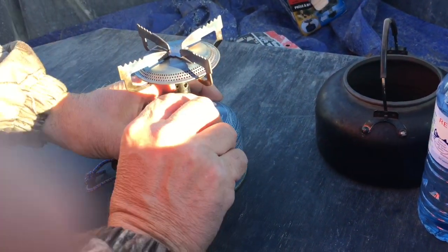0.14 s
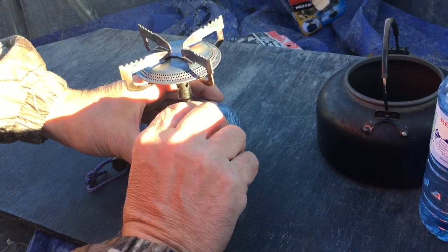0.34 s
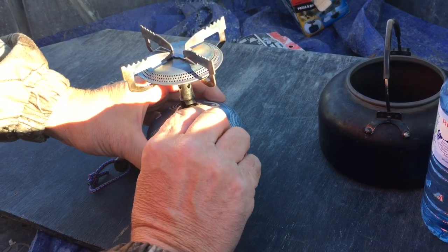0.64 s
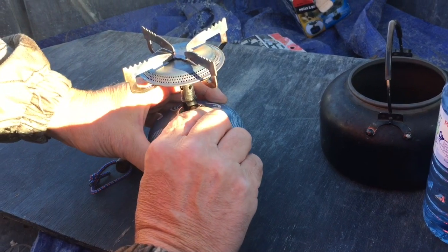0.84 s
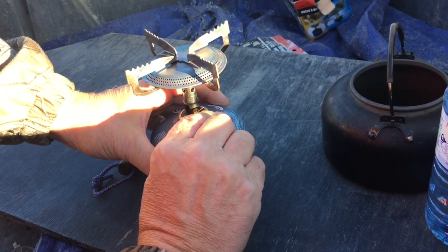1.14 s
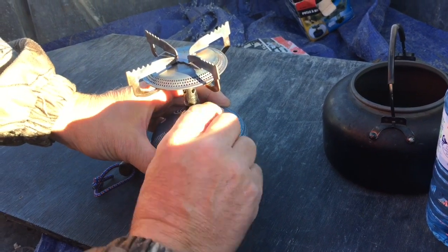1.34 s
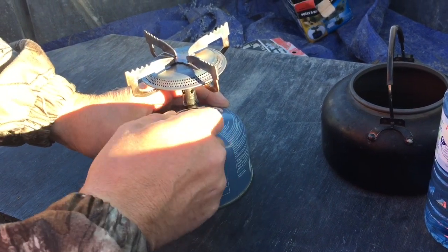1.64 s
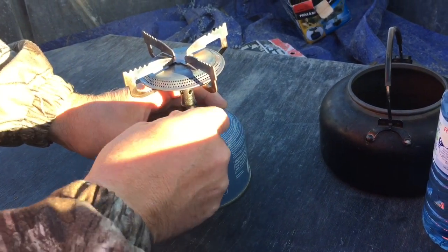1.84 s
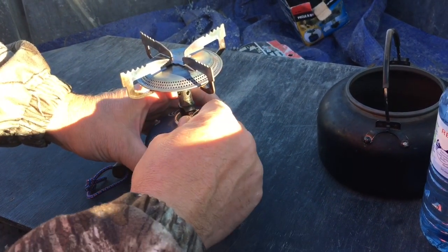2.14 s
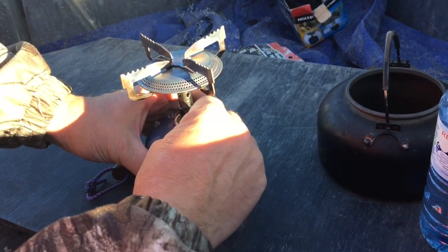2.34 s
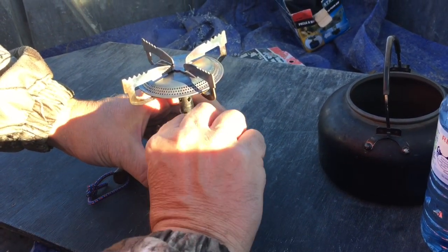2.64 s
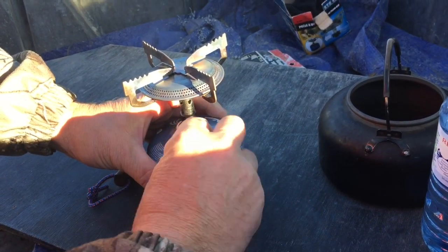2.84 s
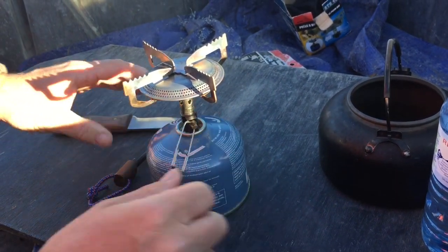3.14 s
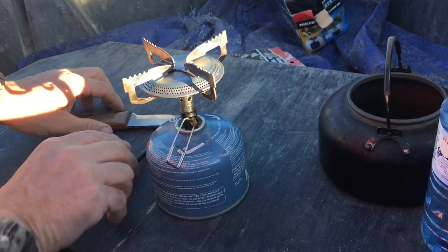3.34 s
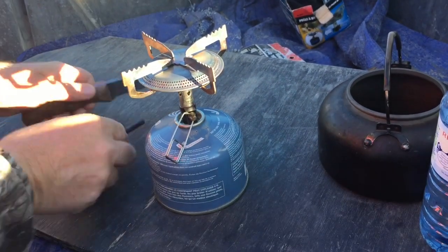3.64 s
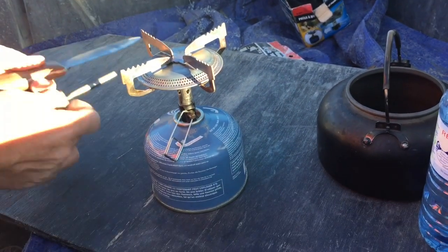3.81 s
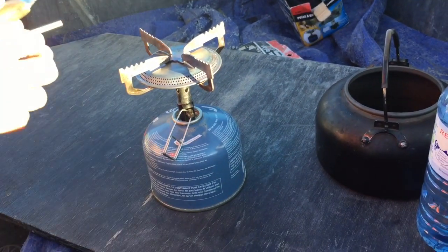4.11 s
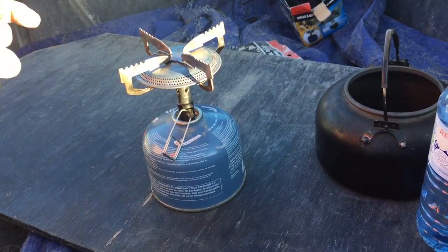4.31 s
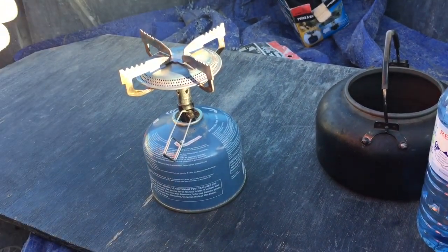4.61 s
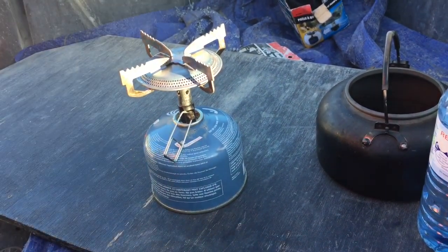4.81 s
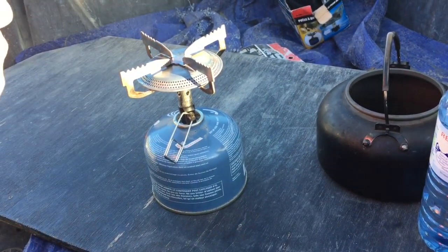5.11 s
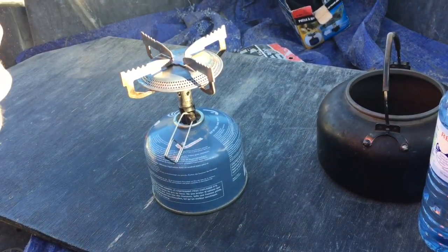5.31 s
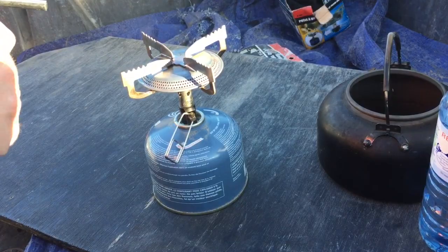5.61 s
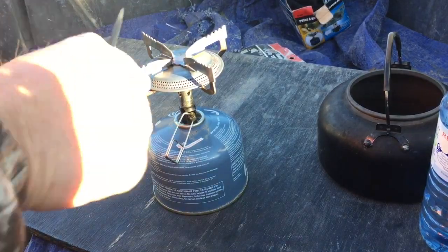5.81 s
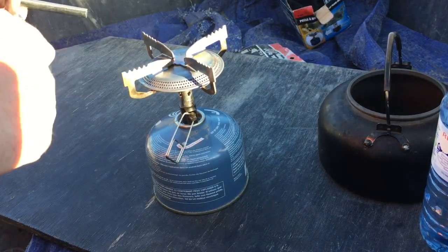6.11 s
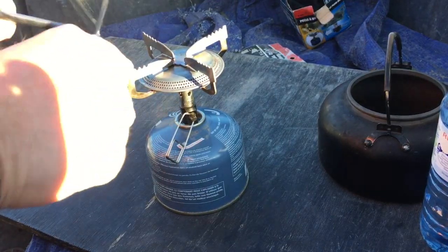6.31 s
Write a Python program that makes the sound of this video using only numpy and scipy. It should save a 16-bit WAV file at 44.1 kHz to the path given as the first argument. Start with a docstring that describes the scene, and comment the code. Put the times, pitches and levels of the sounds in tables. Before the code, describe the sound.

Handling thumps on the microphone, metal clinks as a burner is turned, then gas hisses steadily while a blade drags and clacks on steel.

```python
"""Loud bumps and a dulling rumble come first, as a hand settles its grip on the microphone, with a brief scrape.
Outdoors, hands screw and turn a gas burner on its canister: grit drives damped modes as parts clink and fingers rub.
The valve opens and gas hisses: turbulent noise with peaks, perhaps from its echo off the board.
A knife touches a steel rod, is dragged off its board in uneven slips, then is struck and scraped on the rod.
Behind lie a far, wavering hum, made of a slowly sinking tone, and the smooth noise of open air."""
import sys
import numpy as np
from scipy import signal
from scipy.fft import rfft, irfft
from scipy.io import wavfile
from scipy.ndimage import uniform_filter1d

SR = 44100
rng = np.random.default_rng(int(sys.argv[2]) if len(sys.argv) > 2 else 0)


def linear_from_db(decibels):
    """Turn decibels (scalar or array-like) into linear amplitude factors; 0 gives 1."""
    return 10 ** (np.asarray(decibels, float) / 20)


def store_wav(level_fs):
    """Save 16-bit WAV to argv[1]."""
    pcm = np.round(np.clip(np.atleast_2d(level_fs), -1, 1) * 32767)
    wavfile.write(sys.argv[1], SR, pcm.T.astype(np.int16))


N = 284886  # length in samples

# Gas flow once the valve is open. Each row: time in seconds, hiss level in dB.
GAS_FLOW = [(2.6, -39.5), (2.84, -40.5), (3.4, -42), (4.1, -42), (4.67, -42.5), (5.15, -43.5), (5.6, -43),
            (6.46, -44)]
# Broad colour of the turbulent jet. Each row: frequency in Hz, relative density in dB per Hz.
JET_COLOUR = [(110, -30), (200, 0), (1350, 0), (2200, 3), (3300, -3), (4400, 2), (5600, 0), (6300, -4),
              (7000, -2), (8000, -7), (10500, -13), (12300, -12), (14500, -9), (16000, -6)]
# Peaks in the hiss, perhaps from its echo off the board, over the jet's broad colour.
# Each row: frequency in Hz, width in Hz, boost in dB.
HISS_PEAKS = [(620, 220, 4), (1000, 350, 4), (1860, 400, 6), (2490, 220, 9.5), (2800, 250, 3),
              (3950, 500, 3), (4980, 560, 11.5), (5400, 180, 4), (5860, 240, 5), (6700, 400, 5),
              (7420, 560, 8), (8800, 1300, 4), (10000, 180, 4), (11400, 420, 12), (13200, 500, 5),
              (15350, 800, 5)]
# Modes of burner and canister. Each row: frequency in Hz, relative level in dB, 60 dB decay time in seconds.
BURNER_MODES = [(370, -3, .09), (711, 2, .12), (931, -9, .1), (1217, -8, .12), (1631, 3, .18),
                (2622, -19, .4), (2760, -18, .4), (3149, -3, .1), (3445, -18, .25), (3747, -19, .45),
                (3920, -19, .4), (4414, 0, .09), (4834, -9, .08), (5120, -11, .1), (5690, -6, .09),
                (5908, -9, .15), (6600, -5, .15), (6900, 0, .05), (7250, -2, .05), (7892, -14, .13),
                (8780, -11, .05), (9388, -11, .06), (10200, -10, .05), (11500, -11, .04)]
# Clinks of metal parts, and low knocks of the canister on the board. Each row: start in seconds, peak in dB,
# centre in Hz, spread in octaves, # contact time in seconds.
CLINKS = [(.169, -25.5, 5150, 0.67, 0.0059), (1.459, -48, 600, 0.94, 0.0043),
          (1.52, -49, 1650, 0.16, 0.022), (1.588, -48.5, 6440, 0.77, 0.037),
          (1.78, -36.5, 5600, 1.6, 0.058), (1.8085, -22.5, 6450, 0.52, 0.009),
          (1.81, -24, 844, 0.61, 0.0086), (1.866, -32.5, 5530, 1.04, 0.0059),
          (1.9704, -34.5, 6140, 0.37, 0.0038), (2.047, -50, 6040, 0.4, .006),
          (2.2285, -31.5, 4160, .7, 0.018), (2.24, -39, 5600, 0.63, 0.01), (2.274, -36, 4930, 1.6, 0.0093),
          (2.3559, -21.5, 5400, 0.81, 0.0057), (2.37, -27, 4600, 1.1, 0.021),
          (2.4144, -15, 4000, 1.33, 0.008), (2.416, -21.5, 403, 0.37, 0.014)]
# Finger strokes on metal. Each row: start in seconds, length in seconds, level in dB.
FINGER_RUBS = [(0.158, 0.052, -52), (0.209, .13, -56.5), (1.436, .12, -62), (1.72, 0.083, -67),
               (1.792, 0.2, -63), (2.03, 0.12, -64.5), (2.184, 0.14, -59), (2.393, 0.094, -55)]
# Colour of skin sliding on metal. Each row: frequency in Hz, relative density in dB per Hz.
RUB_COLOUR = [(180, -21), (300, 4), (519, -1.5), (1120, -20), (2790, -4), (4090, -12.5), (6200, -6),
              (8220, -17.5), (9800, -16), (12700, -21.5), (16000, -25)]
# Resonances of the board. Each row: frequency in Hz, width in Hz, relative level in dB.
BOARD_RESONANCES = [(137, 49, -1), (264.3, 45, 5), (393, 71, -13), (600, 44, 2), (717, 73, -16),
                    (1190, 170, -11)]
# The dragged knife catches and slips. Each row: start in seconds, board level in dB, grit level in dB.
KNIFE_SLIPS = [(3.449, -27.5, -53), (3.481, -37, -42), (3.556, -52, -35.5), (3.566, -31, -35),
               (3.592, -24, -59), (3.636, -30, -42), (3.674, -30.5, -51), (3.695, -29.5, -50)]
# Modes of blade and rod, damped by the hand. Each row: frequency in Hz, relative level in dB,
# 60 dB decay time in seconds.
STEEL_MODES = [(1130, 0, .025), (1520, 0, .025), (2210, -2, .018), (2715, 2, .018), (3200, -5, .015),
               (4080, 0, .017), (4500, -6, .012), (6000, -4, .015), (7500, -6, .015), (9900, -10, .012),
               (11400, -10, .012)]
# Blade meets rod. Each row: start in seconds, peak in dB, centre in Hz, spread in octaves,
# contact time in seconds.
BLADE_STRIKES = [(3.2246, -28, 2400, 0.65, 0.0078), (3.525, -28, 2400, 0.23, 0.0039),
                 (3.8901, -25.5, 2730, 0.61, 0.0035), (5.5145, -14, 4000, 0.55, 0.006),
                 (5.641, -30, 2500, 0.86, 0.0071), (5.8544, -18, 3240, 0.65, 0.0054),
                 (5.8875, -22.5, 3500, 0.99, 0.0048), (6.1664, -11.5, 2900, 0.57, 0.0039),
                 (6.2028, -21, 2520, 0.23, 0.0042), (6.2293, -30.5, 1640, .7, 0.0039),
                 (6.327, -18, 2750, 0.097, 0.0076)]
# Blade scrapes along the rod. Each row: start in seconds, length in seconds, level in dB, centre in Hz,
# spread in octaves.
BLADE_STROKES = [(3.232, 0.025, -36.5, 2080, 0.19), (5.842, 0.019, -28.5, 3140, .5),
                 (5.86, 0.025, -29, 2740, 0.12), (5.864, 0.02, -30, 1400, 0.14),
                 (6.208, .02, -43, 2530, 0.22), (6.302, 0.017, -33.5, 2900, 0.45),
                 (6.315, 0.02, -26.5, 2740, 0.061), (6.334, 0.02, -32, 2560, 0.66)]
# Bumps on the microphone. Each row: start in seconds, peak in dB, pitch in Hz.
MICROPHONE_BUMPS = [(.058, -6.5, 215.5), (.088, -16.5, 192), (.125, -13, 145.6), (0.194, -21, 119.5),
                    (0.334, -25.5, 82), (1.11, -31, 132), (1.164, -27.5, 119), (1.194, -26.5, 45.6),
                    (2.25, -31, 75), (2.42, -26, 169), (2.691, -24.5, 65), (2.936, -28.5, 71),
                    (3.021, -33.5, 70), (3.195, -26, 113), (3.46, -34, 62), (5.177, -25.5, 62.3),
                    (5.209, -29, 111), (5.469, -27, 88.4), (5.857, -28, 45.4), (5.899, -28.5, 55.6),
                    (6.028, -34, 61.4)]
# The far hum. Each row: time in seconds, level in dB.
HUM_LEVEL = [(0.25, -45), (0.36, -36.5), (.9, -40), (1.2, -38), (1.4, -38), (1.85, -36), (2.3, -43),
             (2.45, -38), (2.7, -40), (2.8, -48.5), (3.4, -45), (3.6, -36), (3.8, -45), (4.2, -43),
             (4.5, -47.5), (5.5, -47), (5.7, -52), (6.46, -50.5)]
# Colour of the open air. Each row: frequency in Hz, relative density in dB per Hz.
AIR_COLOUR = [(15, -76), (25, -18), (43, -11.5), (76, 4.5), (102, -1), (127, -21.5), (161, -21),
              (545, -37.5), (887, -36.5), (1100, -27), (1370, -34.5), (4250, -42), (4870, -43),
              (14400, -54), (16000, -41)]


def clock():
    """Sampling principle: the time in seconds of every sample."""
    return np.arange(N) / SR


def evened(x):
    """Normalisation of power: scales a signal to rms 1."""
    return x / np.sqrt(np.mean(x ** 2) + 1e-20)


def band_rms(x, lo_hz, hi_hz):
    """Band filtering: the rms of a signal between two frequencies."""
    band = signal.butter(4, [lo_hz, hi_hz], "band", fs=SR, output="sos")
    return np.std(signal.sosfilt(band, x))


def level_over_time(rows):
    """Linear interpolation of a level in dB between its rows, at every sample."""
    s, db = np.transpose(rows)
    return np.interp(clock(), s, db)


def colour_db(rows, hz):
    """Linear interpolation of a spectrum in dB on a logarithmic frequency axis."""
    f, db = np.transpose(rows)
    return np.interp(np.log(hz + 1), np.log(f + 1), db)


def resonance_power(peaks, hz):
    """Lorentzian resonance: summed power of peaks given as (Hz, half-power width in Hz, dB)."""
    return sum(linear_from_db(db) ** 2 / (1 + (2 * (hz - f) / w) ** 2) for f, w, db in peaks)


def nearness(hz, centre_hz, octaves):
    """Selective excitation: a Gaussian weight on the distance in octaves from a centre."""
    return np.exp(-.5 * (np.log2(hz / centre_hz) / octaves) ** 2)


def hold(start, length, edge):
    """Envelope principle: swells in over edge seconds, holds until length, then decays exponentially."""
    t = clock() - start
    swell = np.clip(t / edge, 0, 1) ** 2
    return swell * np.exp(-np.maximum(t - length, 0) / edge * 2)


def add(mix, s, sound):
    """Superposition: adds a sound into the mix at s seconds."""
    part = mix[max(round(s * SR), 0):][:len(sound)]
    part += sound[:len(part)]


def noise(gain, patchy_db, flicker_db, size=1024, count=10, order=7):
    """Short-time synthesis of coloured noise of rms 1, with patches count frames by order bins, and flicker."""
    hz = np.fft.rfftfreq(size, 1 / SR)
    frames = 4 * N // size + 5
    real, imaginary, patches = rng.standard_normal((frames, len(hz), 3)).T
    patches = uniform_filter1d(patches, size=order, axis=0)
    patches = evened(uniform_filter1d(patches, size=count, axis=1))
    flicker = evened(uniform_filter1d(rng.standard_normal(frames), size=3))  # shared by all bins
    spectra = (real + 1j * imaginary) * gain(hz)[:, None]
    spectra *= linear_from_db(patchy_db * patches + flicker_db * flicker)
    return evened(signal.istft(spectra, nperseg=size, noverlap=3 * size // 4)[1][:N])


def ring(modes, length):
    """Modal vibration: each mode is an exponentially decaying sine, one row a mode."""
    t = np.arange(round(length * SR)) / SR
    hz, db, t60 = np.transpose(modes)[:, :, None]
    return linear_from_db(db - 60 * t / t60) * np.sin(2 * np.pi * hz * t)


def blows(events, modes, ringing, scatter_db, swell, tail, tail_db, fizz_db):
    """Modal excitation: a gritty contact drives the modes near its centre and scratches in the same colour."""
    out = np.zeros(N)
    rings, hz = ring(modes, .5), np.array(modes)[:, 0]
    t = np.arange(4096) / SR
    bins = np.fft.rfftfreq(4096, 1 / SR) + 1
    # the same modes, gripped by the hand
    damped = np.sqrt(.15 + resonance_power([(f, 0.073 * f, db) for f, db, _ in modes], bins))
    for s, db, centre_hz, octaves, contact in events:
        scatter = linear_from_db(scatter_db * rng.standard_normal(len(modes)))
        rough = rng.standard_normal(4096)
        shape = (1 - np.exp(-t * swell / contact ** 2)) * np.exp(-2 * t / contact)  # long contacts swell in
        grit = rough * shape
        # how much of the grit falls on each mode
        reach = abs(np.exp(-2j * np.pi * np.outer(hz, t)) @ grit) / np.linalg.norm(grit)
        body = (nearness(hz, centre_hz, octaves) * scatter / (reach + 1.0)) @ rings
        sound = signal.fftconvolve(grit, body)
        share = np.clip(ringing / (1 + (900 / centre_hz) ** 2), 0, 1)  # dull knocks ring less
        sound *= share / abs(sound).max()

        fizz = linear_from_db(fizz_db) * bins / (bins + 4 * centre_hz) / (1 + (bins / 12000) ** 2)
        scratch = irfft(rfft(rough) * (nearness(bins, centre_hz, octaves) * damped + fizz))
        lingering = linear_from_db(tail_db - 60 * t / tail) * np.minimum(t / contact, 1)
        scratch *= shape / shape.max() + lingering
        add(sound, 0, (1 - share) * scratch / abs(scratch).max())
        add(out, s, linear_from_db(db) * sound / abs(sound).max())
    return out


def gas():
    """Turbulent jet noise with spectral peaks; the colour drifts slowly as the microphone sways."""
    valve_s, opening_s = 2.582, 0.053
    gush_db = -9.5  # the valve cracks open to this much under full flow, then opens fully
    t = np.maximum(clock() - valve_s, 0)
    opening = np.minimum(t / .025, 1) ** 2 * linear_from_db(gush_db * np.exp(-t / opening_s))

    def hiss_gain(hz):
        """Spectral shaping: peaks, each halved in dB half its width away, add to the jet's colour."""
        peaks_db = sum(db * 2 ** -(2 * (hz - f) / w) ** 2 for f, w, db in HISS_PEAKS)
        return linear_from_db(colour_db(JET_COLOUR, hz) + peaks_db)

    hiss = noise(hiss_gain, patchy_db=2.2, flicker_db=.7, count=50, order=3)
    return hiss / band_rms(hiss, 4000, 9000) * linear_from_db(level_over_time(GAS_FLOW)) * opening


def clinks():
    """Impact excitation: metal parts clink together and the canister knocks on the board, ringing the burner's
    modes."""
    return blows(CLINKS, BURNER_MODES, ringing=.45, scatter_db=4.5, swell=0.18,
                 tail=0.1, tail_db=-17, fizz_db=-10.5)


def fingers():
    """Sliding friction: skin on metal gives a patchy hiss, part of it ringing the burner."""
    hiss = noise(lambda hz: linear_from_db(colour_db(RUB_COLOUR, hz)), patchy_db=3.0, flicker_db=2.0, size=512)
    rung = evened(signal.fftconvolve(hiss, ring(BURNER_MODES, .3).sum(0))[:N])
    sound = hiss + .8 * rung
    sound /= band_rms(sound, 2000, 9000)
    return sound * sum(linear_from_db(db) * hold(s, length, edge=0.04) for s, length, db in FINGER_RUBS)


def drag():
    """Stick-slip friction: uneven slips of the knife ring the board; grit adds a bright scratch."""
    start_s, end_s, drag_db = 3.445, 3.735, -36.5
    rise_s, decay_s = 0.0022, 0.011  # of one slip
    board = noise(lambda hz: np.sqrt(resonance_power(BOARD_RESONANCES, hz)),
                  patchy_db=2.5, flicker_db=0.0, size=512)
    grit = noise(lambda hz: np.sqrt(resonance_power([(3240, 1400, 0)], hz)) / (1 + (hz / 5500) ** 3),
                 patchy_db=3.5, flicker_db=2.5, size=256)
    grit /= band_rms(grit, 3160, 3415)
    out = linear_from_db(drag_db) * hold(start_s, end_s - start_s, 0.013) * board
    t = np.arange(SR // 10) / SR
    slip = np.minimum(t / rise_s, 1) * np.exp(-t / decay_s)
    for s, board_db, grit_db in KNIFE_SLIPS:
        at = slice(round(s * SR), round(s * SR) + len(t))
        add(out, s, slip * (linear_from_db(board_db) * board[at] + linear_from_db(grit_db) * grit[at]))
    return out


def strokes():
    """Granular excitation: grit under the blade rings the steel modes near a centre, with a little bare scratch."""
    grains_per_s = 2500
    out = np.zeros(N)
    rings, hz = ring(STEEL_MODES, .05), np.array(STEEL_MODES)[:, 0]
    chance = grains_per_s / SR
    grains = rng.standard_normal(N) * (rng.random(N) < chance) / np.sqrt(chance)
    for s, length, db, centre_hz, octaves in BLADE_STROKES:
        body = nearness(hz, centre_hz, octaves) @ rings
        at = slice(round(s * SR), round((s + .1) * SR))
        drive = grains[at] * hold(s, length, edge=0.0066)[at]
        add(out, s, linear_from_db(db) * signal.fftconvolve(drive, body / np.linalg.norm(body)))
        add(out, s, linear_from_db(db - 13) * np.diff(drive))  # bare scratch
    return out


def steel():
    """High-pass filtering: blade strikes and scrapes the rod, heard with no bass below about 900 Hz."""
    strikes = blows(BLADE_STRIKES, STEEL_MODES, ringing=.55, scatter_db=2.5, swell=0.022,
                    tail=0.06, tail_db=-18, fizz_db=-4)
    no_bass = signal.butter(3, 900, "high", fs=SR, output="sos")
    return signal.sosfilt(no_bass, strikes + strokes())


def grip():
    """Contact noise: a dense rumble from the first grab of the microphone holds, dulls and settles."""
    grab_db, grab_s, settle_db_per_s = -22, .12, 155
    bright, dulling_s = 0.69, .2  # starting share of the fuller rumble, and its fading time

    def dull_gain(hz):
        """Low resonance with the deepest bass and the treble filtered away."""
        return np.sqrt(resonance_power([(110, 65, 0)], hz)) * hz / (hz + 60) / (1 + (hz / 300) ** 3)

    def full_gain(hz):
        """Two broader, higher resonances, filtered likewise."""
        peaks = [(200, 190, 0), (380, 260, -6)]
        return np.sqrt(resonance_power(peaks, hz)) * hz / (hz + 150) / (1 + (hz / 700) ** 4)

    dull = noise(dull_gain, patchy_db=2.5, flicker_db=1.5)
    full = noise(full_gain, patchy_db=2.2, flicker_db=1.6)
    share = np.clip(bright * np.exp(-(clock() / dulling_s) ** 2), 0, 1)
    level_db = grab_db - settle_db_per_s * np.maximum(clock() - grab_s, 0)
    return linear_from_db(level_db) * (share * full + np.sqrt(1 - share ** 2) * dull)


def scrape():
    """Friction noise with resonance: a brief scrape sags from the start, then drops away."""
    start_db, sag_db_per_s = -39, 79
    end_s, extra_db_per_s = 0.06, 500  # from end_s on, this fall adds to the sag
    peaks = [(1020, 490, 9), (2320, 90, 7.5), (3500, 1200, -13), (5660, 200, -21)]
    sound = noise(lambda hz: np.sqrt(resonance_power(peaks, hz)) / (1 + (hz / 7000) ** 4),
                  patchy_db=1.5, flicker_db=1.8, size=512)
    now = clock()
    level_db = start_db - sag_db_per_s * now - extra_db_per_s * np.maximum(now - end_s, 0)
    return linear_from_db(level_db) * sound / band_rms(sound, 1100, 5000)


def bumps():
    """Damped oscillation: each bump is a low tone and an upper partial that dies twice as fast."""
    out = np.zeros(N)
    t = np.arange(SR // 4) / SR
    for s, db, hz in MICROPHONE_BUMPS:
        t60 = .06 + 4.0 / hz  # a fixed time in seconds plus four of its own cycles
        decay = linear_from_db(-60 * t / t60)
        partial = 0.77 * np.sin(2 * np.pi * 1.7 * hz * t) * decay
        shove = (np.sin(2 * np.pi * hz * t) + partial) * decay
        shove *= np.minimum(t / 0.007, 1)
        add(out, s, linear_from_db(db) * shove / abs(shove).max())
    return out


def hum():
    """Random modulation: a low tone sinks slowly, with a faint octave and a fuzzy skirt."""
    start_hz, sag_hz_per_s = 97.8, .6
    phase = 2 * np.pi * np.cumsum(start_hz - sag_hz_per_s * clock()) / SR
    smoothing = [1, -np.exp(-2 * np.pi * 6 / SR)]  # low-pass at 6 Hz
    waver = evened(signal.lfilter([1], smoothing, rng.standard_normal((N, 2)), axis=0)).T
    tone = (1 + 0.11 * waver[0]) * np.sin(phase) + 0.069 * waver[1] * np.cos(phase)
    octave = linear_from_db(-32) * np.sin(2 * phase)
    return np.sqrt(2) * linear_from_db(level_over_time(HUM_LEVEL)) * (tone + octave)


def air():
    """Stationary noise: the quiet, smooth floor of the open air."""
    floor = noise(lambda hz: linear_from_db(colour_db(AIR_COLOUR, hz)), patchy_db=1.2, flicker_db=.4, size=2048)
    return floor / band_rms(floor, 300, 16000) * linear_from_db(-66)


def scene():
    """Superposition of all sources, in one channel."""
    burner = gas() + clinks() + fingers()
    knife = drag() + steel()
    microphone = grip() + scrape() + bumps()
    return (burner + knife + microphone + hum() + air())[None]


def band_limit(x):
    """A steep low-pass at the top of the band."""
    return signal.sosfilt(signal.butter(12, 16350, fs=SR, output="sos"), x)


def record(dry):
    """Band limiting: the microphone loses the deepest bass and the top edge of the treble."""
    bass_cut = signal.butter(3, 38., "high", fs=SR, output="sos")
    top_cut = signal.firwin(511, 15720, window=("kaiser", 9), fs=SR)
    heard = signal.sosfilt(bass_cut, dry)
    heard = signal.oaconvolve(heard, top_cut[None], "same")
    return band_limit(heard)


dry = scene()
out = record(dry)
store_wav(out)
```